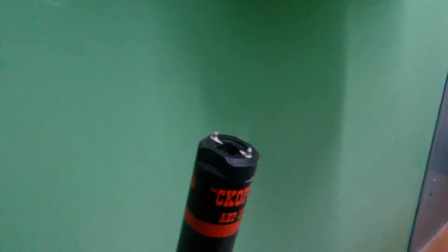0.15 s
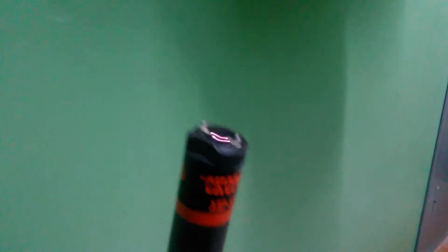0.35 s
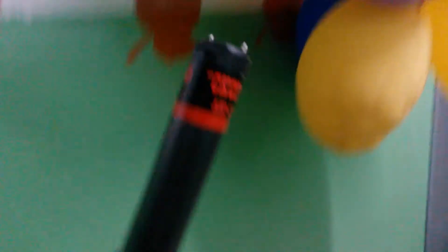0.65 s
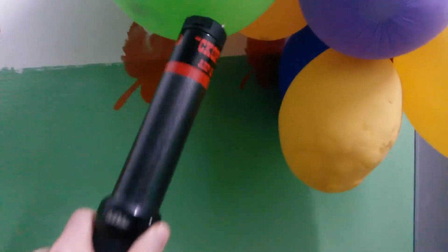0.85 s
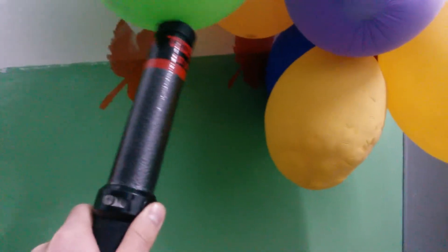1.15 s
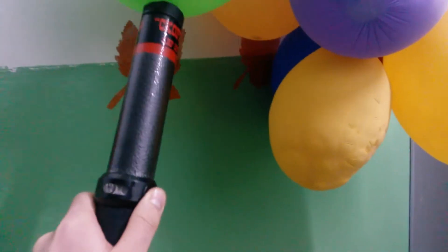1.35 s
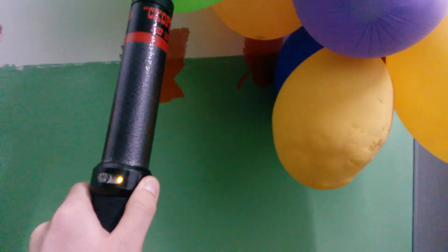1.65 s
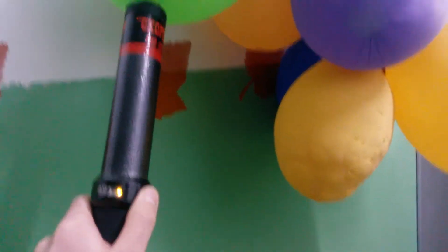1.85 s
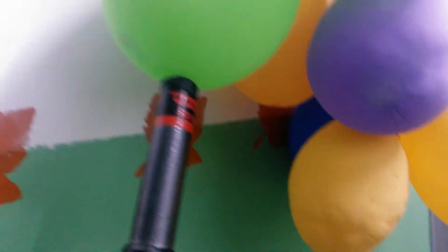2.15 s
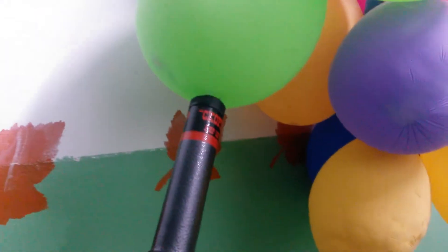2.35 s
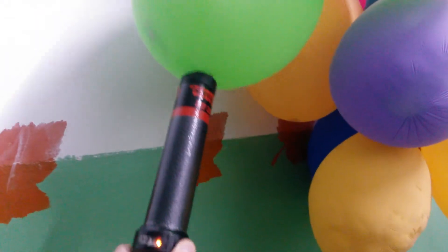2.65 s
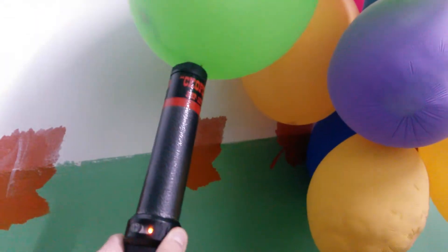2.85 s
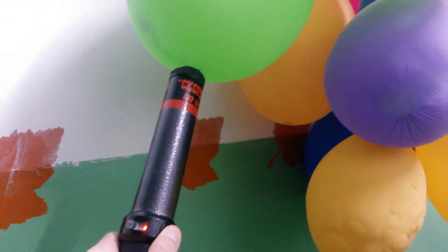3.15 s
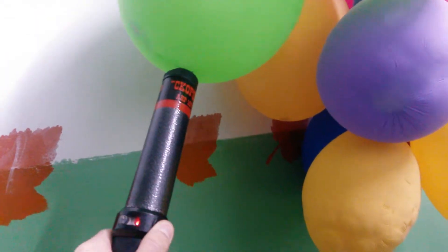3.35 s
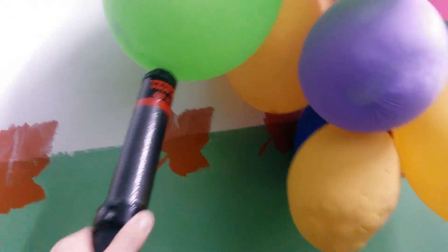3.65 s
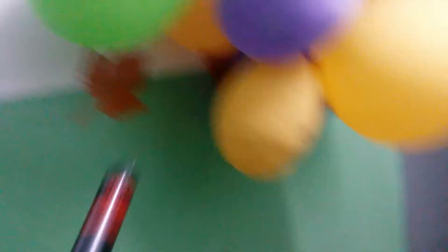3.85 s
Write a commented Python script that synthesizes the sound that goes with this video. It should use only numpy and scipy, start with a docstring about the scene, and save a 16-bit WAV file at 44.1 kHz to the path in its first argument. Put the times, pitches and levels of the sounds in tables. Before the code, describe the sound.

A stun baton's sharp, bright electric crackle, close in a reverberant stairwell, is already running and stops at 0.2 s. A click and second brief burst follow at 0.37-0.5 s. Faint far thuds and cloth rustle fill the pause. After a click at 1.6 s, a long burst slows from a fast buzz to a coarse rattle, stopping at 3.75 s with another click; grainy rubber creaks near 3.95 s.

```python
"""A stun baton is already firing close by in a hard-walled stairwell; a second brief pull follows. Cloth rustles
in the pause, then a long pull against a balloon slows as the battery sags; at the end rubber creaks in grainy slips.
Each spark is a pulse with a colour, copied along near echo paths, with a noise tail for the room, and pushes the
microphones into a low blip. Low bumps and pops join some sparks. The trigger clicks as bright noise; far thuds are
decaying low noise throughout."""
import sys
import numpy as np
from scipy import signal
from scipy.fft import rfft, irfft
from scipy.io import wavfile

SR = 44100
rng = np.random.default_rng(int(sys.argv[2]) if len(sys.argv) > 2 else 0)


def invert_db(level):
    """Linear amplitude ratio for a level in decibels (20 dB per decade), elementwise."""
    return 10 ** (np.asarray(level, dtype=float) / 20)


def store_wav(level_fs):
    """Save 16-bit WAV to argv[1]."""
    pcm = np.round(np.clip(np.atleast_2d(level_fs), -1, 1) * 32767)
    wavfile.write(sys.argv[1], SR, pcm.T.astype(np.int16))


N = 176400

# All levels are relative, ahead of the gain in record().
# hush of the building, spectrum: hz, density_db
HUSH_SPECTRUM = [(15, -54), (25, -24), (75, 12), (171, -29), (331, 15), (515, -34), (1270, 22), (3000, -30),
                 (3900, -52), (6600, -120)]
HUSH_DB = -75

# cloth rustle: time_s, level_db
RUSTLE_LEVEL = [(0.8, -67.5), (0.878, -55), (1.082, -65.5), (1.212, -62), (1.302, -64), (1.322, -59.5),
                (1.38, -58), (1.468, -45.5), (1.59, -53)]
# cloth rustle, spectrum: hz, density_db
RUSTLE_SPECTRUM = [(880, -49), (1500, -21.5), (3210, -13), (3540, -15.5), (5200, -16), (7420, -5.5),
                   (10600, -20.5), (13000, -43), (14200, -41), (15000, -72)]

# far thuds: start_s, level_db, t60_s, boom_db
THUD_EVENTS = [(0.036, -42, 1.76, -44.5), (0.637, -37, 1.55, -51), (1.203, -37, 1.92, -38.5),
               (1.793, -40, 0.9, -42), (2.407, -43.5, 1.4, -37), (2.998, -43.5, 1.13, -42.5),
               (3.62, -37.5, 2.35, -38)]
# far thuds, spectrum: hz, density_db
THUD_SPECTRUM = [(29, -68), (50, -30.5), (69, -26.5), (135, -15.5), (178, -12.5), (371, -5.5), (711, -9),
                 (844, -17), (1650, -31), (3000, -52), (3900, -43.5), (6600, -120)]
THUD_RISE_S, THUD_LUMPS_DB, THUD_LEFT_OVER_RIGHT_DB = 0.0091, 1.5, -4.5
THUD_CORRELATION, UPPER_T60_SHARE = 0.58, 0.89
BOOM_LOW_HZ, BOOM_HIGH_HZ = 276, 366

# rubber slipping against the baton: centre_s, level_db, length_s
RUBBER_SLIPS = [(3.939, -27.5, 0.0027), (3.946, -20.5, 0.0045), (3.953, -37.5, 0.0037),
                (3.962, -24.5, 0.007), (3.976, -20, 0.0033), (3.983, -22, 0.0024), (3.99, -20.5, 0.004),
                (3.997, -23, 0.0029)]
# resonances of the rubber skin: centre_hz, width_hz, level_db
RUBBER_RESONANCES = [(370, 300, 7.5), (3800, 610, 7), (6740, 890, 10.5), (12500, 4000, -34),
                     (5300, 9800, 5)]

# trigger clicks: start_s, left_db, right_db
TRIGGER_CLICKS = [(.3655, -24, -19), (.496, -26, -24), (1.5961, -15, -11), (3.7475, -15, -14)]
TRIGGER_LOW_HZ, TRIGGER_HIGH_HZ, TRIGGER_T60_S = 6740, 9200, 0.021

# low bumps and pops, some along with sparks: start_s, left_height, right_height (signed, before filtering)
LOW_BUMPS = [(0, 0.1, 0.034), (.0093, -0.42, -0.24), (0.1206, -0.06, 0.6), (0.373, 0.17, -0.15),
             (0.1466, -0.19, -0.014), (0.4457, -0.26, 0.11), (1.7016, 0.045, 0.0031), (2.329, 0.02, -0.018),
             (3.095, 0.016, 0.026), (3.947, 0.005, 0.066)]
BUMP_LOW_HZ, BUMP_HIGH_HZ = 58, 231

# sparks, one sub-table per trigger pull: time_s, rate_hz
SPARK_RATES = [
    [(.0092, 83.93), (.09, 79.32), (.1854, 75.8)],
    [(.3721, 86.12), (.42, 79.88), (.4843, 76.19)],
    [(1.6065, 87.77), (1.68, 80.11), (1.8, 75.38), (2.0, 71.51), (2.3, 68.2), (2.6, 63.87), (2.9, 57.62),
     (3.1, 52.56), (3.2, 48.41), (3.27, 45.29), (3.33, 39.62), (3.4, 39.95), (3.5, 38.75), (3.6, 38.61),
     (3.7386, 38.32)],
]
EARLIER_SPARKS, RUN_IN_SAMPLES = 8, 8820   # the first pull is already under way
# spark strength: time_s, crack_db, blip_db
SPARK_STRENGTH = [(0, -5, -6), (.2, -4, -13.5), (.37, -3.5, -16.5), (.5, -6, -11.5), (1.6, -8, -15.5),
                  (1.7, -7, -12), (1.8, -9, -16.5), (2.0, -8.5, -19.5), (2.33, -8.5, -13.5),
                  (2.5, -7.5, -21), (2.95, -8, -18), (3.2, -7.5, -18.5), (3.6, -8, -27.5),
                  (3.75, -6.5, -31)]

BLIP_LOW_HZ = (120, 450)   # left, right
BLIP_DELAY_S = (0.00013, 0.0003)   # left, right
BLIP_FLIP_SHARE = (0.04, 0.3)   # inverted blips: left, right
BLIP_HIGH_HZ_OPEN, BLIP_HIGH_HZ_BALLOON, BLIP_EDGE_HZ = 1040, 1850, 1940
BLIP_RIGHT_DB, BLIP_DRIFT_DB, BLIP_SPREAD_DB = -9.5, 1.2, 4.5
BLIP_REPEAT_S, BLIP_REPEAT_DB = 0.001453, -14.5

# sound paths in the open: left_ms, left_db, right_ms, right_db
OPEN_PATHS = [(.2, 3, .1, 3), (.8, -11, 1.0, -7), (1.45, -9, 1.4, -14), (1.95, -5, 1.75, -5),
              (3.3, -15, 3.3, -14), (4.1, -17, 4.0, -15), (6.05, -16, 6.1, -10), (6.45, -13, 6.5, -13),
              (8.9, -17, 10.3, -17)]
# sound paths at the balloon: left_ms, left_db, right_ms, right_db
BALLOON_PATHS = [(.22, 1, .13, 1.5), (1.15, -4, 1.1, 0), (1.42, 1.5, 1.4, -2), (2.1, -7, 1.85, -3),
                 (2.6, -8, 2.6, -8), (3.4, -10, 3.5, -8), (4.35, -4, 4.3, -5), (4.8, -7, 4.7, -7),
                 (5.3, -9, 5.2, -10), (8.5, -10, 8.45, -8), (11.5, -9, 11.3, -12)]
SPARK_SPREAD_DB, PATH_SPREAD_DB, RAGGED_SHARE = 0.4, 0.5, 0.06
WANDER_MS = 0.03   # rms for a 1 ms path; grows with the root of the delay
ECHO_DULL_HZ, ECHO_DULL_SHARE = 10500, 0.17

# crack colour at each microphone: hz, left_db, right_db
CRACK_COLOUR = [(1000, -29, -37), (2285, -21.5, -21.5), (2930, -17, -16.5), (3690, -8, -12),
                (4180, -2.5, -10), (4770, 1, -1.5), (5210, 1, 0), (5630, 7, -9.5), (5910, 3, -1),
                (7760, 1.5, -3.5), (8330, -12.5, 0), (9520, -15.5, -13), (11000, -27, -21),
                (11500, -16.5, -19.5), (13400, -13, -14.5), (14950, -17, -8), (16070, -27, -48)]
# stairwell decay: hz, t60_s
STAIRWELL_T60 = [(150, 1.6), (400, 0.37), (1000, 0.84), (2000, 1.6), (4000, 0.85), (6000, 0.49),
                 (8000, 0.79), (11000, 0.26), (15000, 0.14)]
WELL_DB_OPEN, WELL_DB_BALLOON, WELL_DELAY_S = -1.5, 3, 0.00043
SCATTER_DB_OPEN, SCATTER_DB_BALLOON, SCATTER_T60_S = -9, -2, 0.035

# extra treble as the tip faces the microphones: time_s, added_share
TIP_FACING = [(0, 0.6), (.5, 0.9), (1.6, 0.61), (2.2, 0.24), (3.0, 0.033), (3.4, 0.56), (3.75, 1)]
FACING_LOW_HZ, FACING_HIGH_HZ = 7000, 8760
# narrow band lifted by the balloon: time_s, added_share
BALLOON_RING = [(1.5, 0), (1.6, 0.15), (2.2, 0.022), (2.6, 0.65), (3.0, 0.21), (3.75, 0)]
RING_LOW_HZ, RING_HIGH_HZ = 5080, 5630

SOUND_S = np.arange(N) / SR
RUN_S = (np.arange(N + RUN_IN_SAMPLES) - RUN_IN_SAMPLES) / SR


def rms_one(x):
    """Scales to rms 1."""
    return x / np.sqrt(np.mean(x ** 2) + 1e-20)


def at_hz(points, hz, column=1):
    """Reads a table on a log-frequency axis."""
    p = np.array(points)
    return np.interp(np.log(np.maximum(hz, 1)), np.log(p[:, 0]), p[:, column])


def at_time(points, time_s, column=1):
    """Reads a table on a time axis."""
    p = np.array(points)
    return np.interp(time_s, p[:, 0], p[:, column])


def coloured(spectrum):
    """Two unrelated noises with the given spectrum, joint rms 1."""
    hz = np.fft.rfftfreq(N, 1 / SR)
    white = rng.standard_normal((2, N))
    return rms_one(irfft(rfft(white) * invert_db(at_hz(spectrum, hz)), N))


def band(x, low_hz, high_hz, order=1):
    """Causal band-pass."""
    sos = signal.butter(order, [low_hz, high_hz], "band", fs=SR, output="sos")
    return signal.sosfilt(sos, x + 1e-18)


def drift(rate_hz):
    """Slow chance: noise through two equal low-pass poles, rms 1."""
    r = np.exp(-2 * np.pi * rate_hz / SR)
    slow = signal.lfilter([1], [1, -2 * r, r * r], rng.standard_normal(N + SR))
    return rms_one(slow[SR:])


def fade(t, t60_s):
    """Exponential decay, 60 dB per t60_s."""
    return invert_db(-60 * t / t60_s)


def clicks(time_s, heights):
    """Pulse train on the time line with run-in."""
    length = N + RUN_IN_SAMPLES
    at = (np.asarray(time_s) * SR).astype(int) + RUN_IN_SAMPLES
    return np.bincount(np.clip(at, 0, length - 1), heights, length)


def hush():
    """Steady coloured noise: the hush of the building."""
    return invert_db(HUSH_DB) * coloured(HUSH_SPECTRUM)


def rustle():
    """Cloth hiss: coloured noise, swelling between the bursts, with a 1 dB flutter."""
    level_db = at_time(RUSTLE_LEVEL, SOUND_S) + drift(40)
    return coloured(RUSTLE_SPECTRUM) * invert_db(level_db)


def thuds():
    """Far footsteps arrive as lumpy low reverberation that dies, the upper part sooner."""
    a, b = coloured(THUD_SPECTRUM)
    right = THUD_CORRELATION * a + np.sqrt(1 - THUD_CORRELATION ** 2) * b
    half_db = THUD_LEFT_OVER_RIGHT_DB / 2
    pair = np.array([a, right]) * invert_db([[half_db], [-half_db]])
    parts = [(20, 800, 1, False), (800, 6000, UPPER_T60_SHARE, False), (BOOM_LOW_HZ, BOOM_HIGH_HZ, 1, True)]
    out = 0
    for low_hz, high_hz, t60_share, is_boom in parts:
        power = 0
        for start_s, level_db, t60_s, boom_db in THUD_EVENTS:
            since_s = SOUND_S - start_s
            height = invert_db(boom_db if is_boom else level_db) * fade(np.clip(since_s, 0, 9), t60_s * t60_share)
            power = power + height ** 2 * np.clip(since_s / THUD_RISE_S, 0, 1)
        lumps = invert_db(THUD_LUMPS_DB * drift(27))
        out = out + band(pair, low_hz, high_hz) * np.sqrt(power) * lumps
    return out


def rubber():
    """Slips are short grainy swells through the resonances of the skin."""
    swell = 0
    for centre_s, level_db, length_s in RUBBER_SLIPS:
        swell = swell + invert_db(level_db) * np.exp(-2 * ((SOUND_S - centre_s) / length_s) ** 2)
    grit = rng.standard_normal((2, N)) * invert_db(1.8 * rng.standard_normal(N))
    tone = 0
    for hz, width_hz, level_db in RUBBER_RESONANCES:
        tone = tone + invert_db(level_db) * rms_one(band(grit, hz - width_hz / 2, hz + width_hz / 2))
    return swell * rms_one(tone)


def trigger():
    """The plastic switch snaps with a short bright rattle of decaying noise."""
    swell = 0
    for start_s, *side_db in TRIGGER_CLICKS:
        since_s = SOUND_S - start_s
        swell = swell + invert_db(np.c_[side_db]) * (since_s > 0) * fade(np.clip(since_s, 0, 1), TRIGGER_T60_S)
    white = rng.standard_normal((2, N))
    bright = rms_one(band(white, TRIGGER_LOW_HZ, TRIGGER_HIGH_HZ, order=2))
    broad = rms_one(band(white, 2000, 14000))
    return swell * (bright + 0.1 * broad)


def low_bumps():
    """Low bumps and pops, some along with sparks: pulses through two low band-passes."""
    start_s, left, right = np.transpose(LOW_BUMPS)
    pulses = np.array([clicks(start_s, left), clicks(start_s, right)])
    low = band(band(pulses, BUMP_LOW_HZ, BUMP_HIGH_HZ), 40, BUMP_HIGH_HZ * 1.5)
    return low * SR / (3 * BUMP_HIGH_HZ)


def blips(spark_s, high_hz):
    """Each spark pushes the microphones into a low blip, with a weaker repeat; thinner on the right."""
    swing_db = BLIP_DRIFT_DB * drift(15.8)[(np.abs(spark_s) * SR).astype(int)]
    level = invert_db(at_time(SPARK_STRENGTH, spark_s, column=2) + swing_db)
    shape = (len(spark_s), 2)
    heights = invert_db(BLIP_SPREAD_DB * rng.uniform(-2.22, 1, shape)) * level[:, None] * invert_db([0, BLIP_RIGHT_DB])
    heights = heights * np.where(rng.random(shape) < BLIP_FLIP_SHARE, -1, 1)
    pair = []
    for side in (0, 1):
        first = clicks(spark_s + BLIP_DELAY_S[side], heights[:, side])
        again = clicks(spark_s + BLIP_REPEAT_S, heights[:, side] * invert_db(BLIP_REPEAT_DB))
        pair.append(band(first + again, BLIP_LOW_HZ[side], high_hz) * SR / (3 * high_hz))
    return band(np.array(pair), 20, BLIP_EDGE_HZ, order=3)


def spark_times(rows):
    """A spark jumps each time the summed rate passes a whole number."""
    time_s, rate_hz = np.transpose(rows)
    t = np.arange(time_s[0], time_s[-1] + 0.005, 1e-4)
    turns = np.cumsum(np.interp(t, time_s, rate_hz)) * 1e-4
    return np.interp(np.arange(int(turns[-1]) + 1), turns, t)


def crack_pulse(column):
    """Causal (minimum-phase) pulse with the crack's colour, height 1, by folding the cepstrum."""
    size = 2048
    hz = np.fft.rfftfreq(size, 1 / SR)
    cepstrum = irfft(np.log(invert_db(at_hz(CRACK_COLOUR, hz, column))))
    cepstrum[1:size // 2] *= 2
    cepstrum[size // 2 + 1:] = 0
    pulse = irfft(np.exp(rfft(cepstrum)))[:size // 2]
    return pulse / np.abs(pulse).max()


def stairwell():
    """Room response: bands of noise, each dying at its own rate; mean energy per side 1."""
    t = np.arange(SR) / SR
    edges_hz = np.geomspace(500, 17000, 12)
    out = 0
    for low_hz, high_hz in zip(edges_hz, edges_hz[1:]):
        noise = band(rng.standard_normal((2, SR)), low_hz, high_hz, order=2)
        out = out + noise * fade(t, at_hz(STAIRWELL_T60, np.sqrt(low_hz * high_hz)))
    out = out * np.clip(t / WELL_DELAY_S - 1, 0, 1)
    return out / np.sqrt(np.sum(out ** 2) / 2)


def near_scatter():
    """Dense scatter off near things: white noise dying fast; mean energy per side 1."""
    t = np.arange(SR) / SR
    noise = rng.standard_normal((2, SR)) * fade(t, SCATTER_T60_S) * np.clip(t / 0.001, 0, 1)
    return rms_one(noise) / np.sqrt(SR)


def cracks(spark_s, paths, well_db, scatter_db, room):
    """Ragged sparks reach each microphone by paths of alternating sign, scatter, then fill the room."""
    count = len(spark_s)
    level_db = at_time(SPARK_STRENGTH, spark_s) + SPARK_SPREAD_DB * rng.standard_normal(count)
    level = invert_db(level_db)
    spark_s = np.round(spark_s * SR) / SR + 0.5 / SR   # whole samples keep the path spacing
    drift_at = (np.abs(spark_s) * SR).astype(int)
    ragged = np.c_[np.ones(count), RAGGED_SHARE * rng.standard_normal((count, 4))]
    direct, echoes = np.zeros((2, 2, N + RUN_IN_SAMPLES))
    for n, path in enumerate(paths):
        gain = (-1) ** n * level * invert_db(PATH_SPREAD_DB * rng.standard_normal(count))
        shift_ms = WANDER_MS * path[0] ** 0.5 * drift(0.5)[drift_at]   # the hand moves
        arrivals = echoes if n else direct
        for side in (0, 1):
            delay_ms, path_db = path[2 * side:2 * side + 2]
            arrive_s = spark_s + (delay_ms + shift_ms) / 1000
            for k in range(5):
                arrivals[side] += clicks(arrive_s + k / SR, gain * ragged[:, k] * invert_db(path_db))
    high_pass = signal.butter(2, ECHO_DULL_HZ, "high", fs=SR, output="sos")
    echo_top = signal.sosfiltfilt(high_pass, echoes + 1e-18)
    out = direct + echoes - ECHO_DULL_SHARE * echo_top
    out += at_time(TIP_FACING, RUN_S) * band(out, FACING_LOW_HZ, FACING_HIGH_HZ)
    source = sum(clicks(spark_s + k / SR, level * ragged[:, k]) for k in range(5))
    around = invert_db(well_db) * room + invert_db(scatter_db) * near_scatter()
    return out + signal.fftconvolve(source[None], around)[:, :N + RUN_IN_SAMPLES]


def baton():
    """All sparks as coloured cracks in the air, with their low blips and the low bumps."""
    first, second, long = [spark_times(rows) for rows in SPARK_RATES]
    first_rate_hz = SPARK_RATES[0][0][1]
    earlier = first[0] - np.arange(EARLIER_SPARKS, 0, -1) / first_rate_hz
    brief = np.r_[earlier, first, second]
    room = stairwell()
    train = cracks(brief, OPEN_PATHS, WELL_DB_OPEN, SCATTER_DB_OPEN, room)
    train = train + cracks(long, BALLOON_PATHS, WELL_DB_BALLOON, SCATTER_DB_BALLOON, room)
    sides = [signal.fftconvolve(train[k], crack_pulse(k + 1)) for k in (0, 1)]
    air = np.array(sides)[:, :N + RUN_IN_SAMPLES]
    air += at_time(BALLOON_RING, RUN_S) * band(air, RING_LOW_HZ, RING_HIGH_HZ)
    lows = blips(brief, BLIP_HIGH_HZ_OPEN) + blips(long, BLIP_HIGH_HZ_BALLOON) + low_bumps()
    return (air + lows)[:, RUN_IN_SAMPLES:]


def scene():
    """Everything at the two microphones."""
    return hush() + rustle() + thuds() + rubber() + trigger() + baton()


def roll_off(x):
    """The treble ends steeply here."""
    return signal.sosfilt(signal.butter(12, 15900, fs=SR, output="sos"), x)


def record(dry):
    """Peaks are rounded, then the top is cut."""
    rounded = 1.32 * np.tanh(dry / 1.59)
    low_pass = signal.cheby2(10, 60, 15820, fs=SR, output="sos")   # 60 dB down from 15820 Hz
    mix = signal.sosfilt(low_pass, rounded)
    return roll_off(mix)


dry = scene()
out = record(dry)
store_wav(out)
```